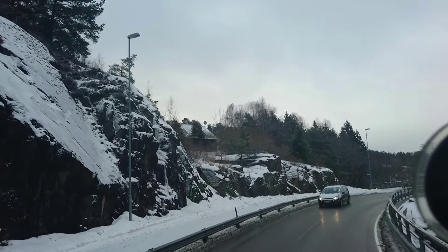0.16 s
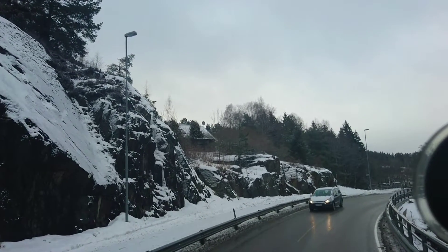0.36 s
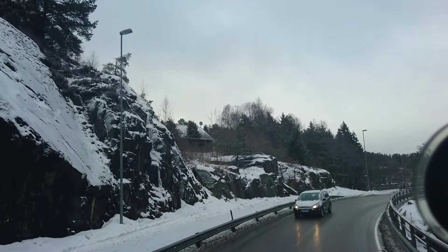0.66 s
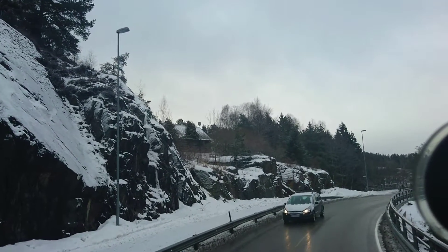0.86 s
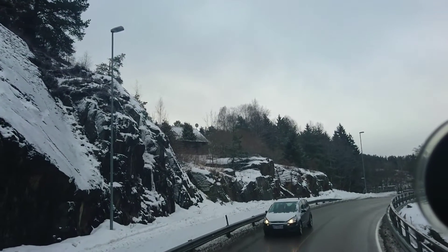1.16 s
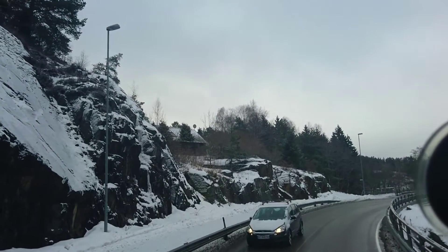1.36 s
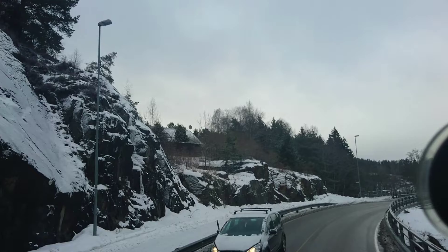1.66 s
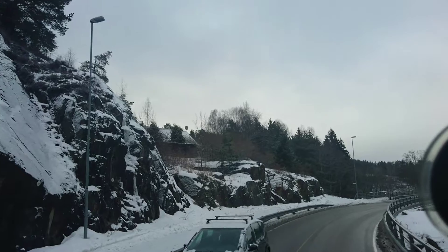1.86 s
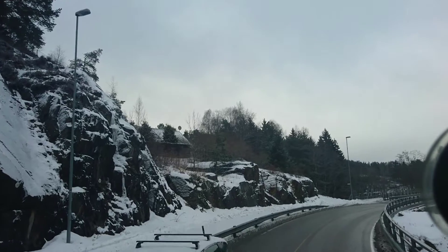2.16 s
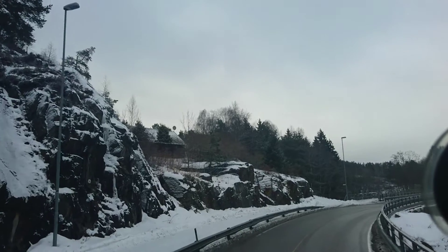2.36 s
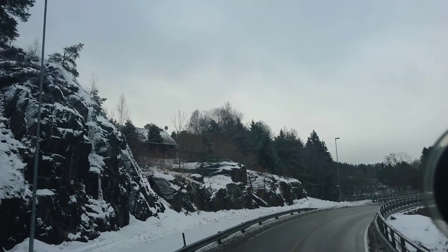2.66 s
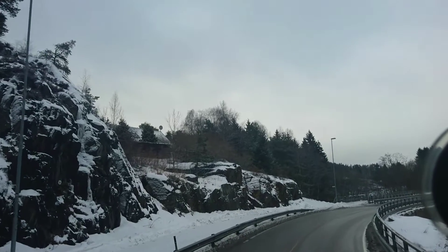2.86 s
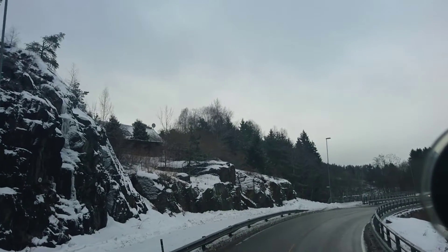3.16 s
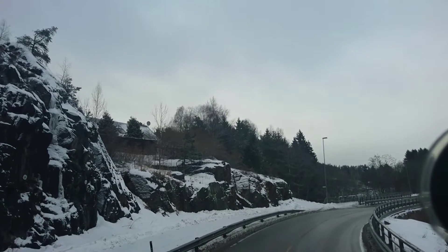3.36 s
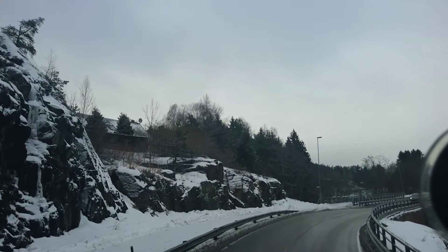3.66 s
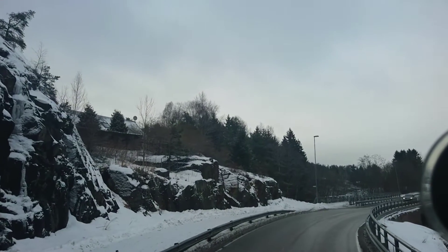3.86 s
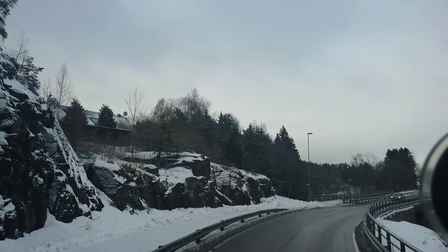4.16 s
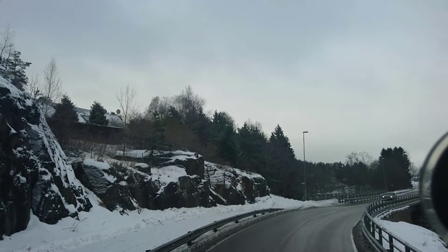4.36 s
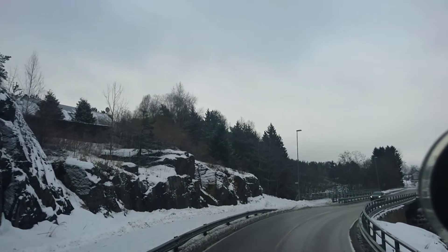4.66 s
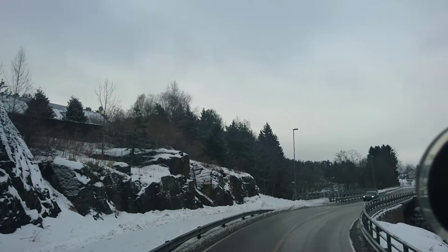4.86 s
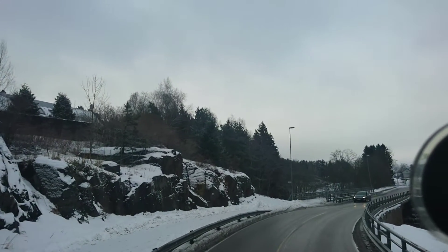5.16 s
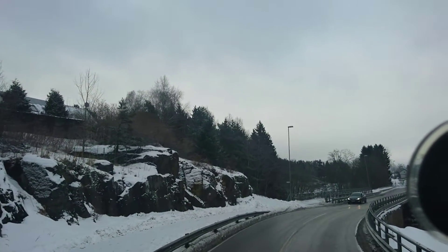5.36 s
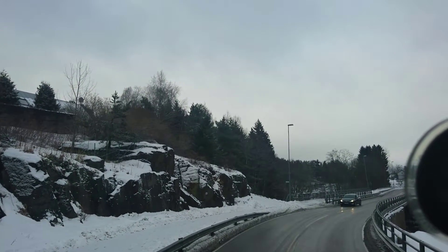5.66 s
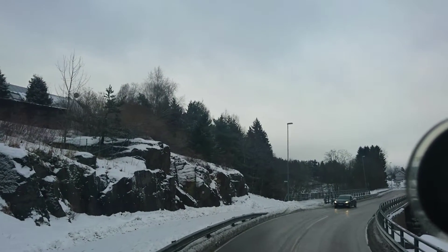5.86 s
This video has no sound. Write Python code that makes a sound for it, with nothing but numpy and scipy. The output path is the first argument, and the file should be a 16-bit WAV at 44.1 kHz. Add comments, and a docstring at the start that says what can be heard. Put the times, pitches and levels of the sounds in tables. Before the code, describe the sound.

Inside a truck cab, the diesel hums and rumbles up through the gears over wet tyre hiss, as a car swishes by.

```python
"""Lorry cab on a wet road

Two microphones inside the cab as the lorry pulls away from idle and shifts up three times. The firings
of the six-cylinder diesel hum through the cab's boom; tyres and engine roar, the turbo whistles faintly.
Outside, an oncoming car swishes past trailing spray; close to the right microphone, small things tick."""
import sys
import numpy as np
from scipy import signal
from scipy.io import wavfile
from scipy.ndimage import uniform_filter1d

SR = 44100
rng = np.random.default_rng(int(sys.argv[2]) if len(sys.argv) > 2 else 0)


def store_wav(level_fs):
    """Save 16-bit WAV to argv[1]."""
    pcm = np.round(np.clip(np.atleast_2d(level_fs), -1, 1) * 32767)
    wavfile.write(sys.argv[1], SR, pcm.T.astype(np.int16))


N = 265482
T = np.arange(N) / SR


def gain_of(db):
    """Decibels to an amplitude factor."""
    return 10 ** (np.asarray(db) / 20)


def unit_rms(x):
    """Scales to rms 1."""
    return x / np.sqrt(np.mean(x ** 2) + 1e-20)


def at_hz(rows, hz, column=1):
    """One column of a frequency table, read on a log-frequency axis."""
    table = np.transpose(rows)
    return np.interp(np.log(hz + 1), np.log(table[0] + 1), table[column])


def over_time(rows):
    """A time table's value at every sample."""
    return np.interp(T, *np.transpose(rows))


def wander(rate_hz):
    """Random drift of rms about 1."""
    t = T[::256]
    drift = sum(np.sin(2 * np.pi * (hz * t + rng.random())) for hz in rate_hz * np.geomspace(.1, 1, 16))
    return np.interp(T, t, unit_rms(drift))


def panned(x, pan_db):
    """Spreads a sound over the two microphones; pan_db is left minus right."""
    return x * gain_of([[pan_db / 2], [-pan_db / 2]])


# Resonances of the panels and air around the microphones: (frequency [Hz], width [Hz], lift [dB])
CAB_MODES = [(120.7, 15, 2.5), (211, 25, 7), (320.5, 42, 7.5), (391.4, 33.5, 7), (559, 30, 6),
             (599.2, 16, 8), (709, 35, 8.5), (949, 111, 6.5), (1259.5, 41, 10), (1402, 66, 5),
             (1670, 79, 3.5), (2026, 15, 5.5), (2530, 60, 3.5), (2990, 46, 5.5), (4500, 860, 2.5)]
def panels_db(hz):
    """The cab's resonances colour every noise from outside."""
    return sum(db / (1 + (2 * (hz - mode_hz) / width) ** 2) for mode_hz, width, db in CAB_MODES)


# The microphone pair in the cab: (frequency [Hz], likeness [0-1], left lead [rad], left minus right [dB])
MIC_PAIR = [(61.3, 1, -1.5, -29), (180, 1, 0.6, -8.5), (330, 0.9, -0.54, -1.5), (587, 0.64, 1.42, -1.5),
            (1022, 0.16, 2.5, -3.5), (1305, 1, 3.5, -3.5), (1490, 0.64, 3.5, -3), (2500, 0.19, 6, -2.5),
            (3170, 0.076, 9.5, -4.5), (4860, 0.097, 13.5, -4.5), (6360, 0.083, 16.5, 2),
            (9050, 0.097, 6, -1)]
def cab_noise(spectrum, patchy_db, size):
    """Cab-coloured noise with drifting patches at the two microphones; their mean has rms 1."""
    frames, hz = 4 * N // size + 5, np.fft.rfftfreq(size, 1 / SR)
    a, b, c, d, patches = rng.standard_normal((frames, len(hz), 5)).T
    patches = unit_rms(uniform_filter1d(uniform_filter1d(patches, size=12, axis=0), size=10, axis=1))
    likeness, lead, pan_db = (at_hz(MIC_PAIR, hz, column)[:, None] for column in (1, 2, 3))
    right, unrelated = a + 1j * b, c + 1j * d
    left = (likeness * right + np.sqrt(1 - likeness ** 2) * unrelated) * np.exp(1j * lead)
    lean = gain_of(pan_db / 2)
    colour_db = (at_hz(spectrum, hz) + panels_db(hz))[:, None] + patchy_db * patches
    spectra = np.array([left * lean, right / lean]) * gain_of(colour_db)
    out = signal.istft(spectra, nperseg=size, noverlap=size - size // 4)[1][:, :N]
    return out / np.sqrt(np.mean(out.mean(0) ** 2))


# The cab's background at the microphones: (frequency [Hz], relative density [dB])
FLOOR_SPECTRUM = [(10, 21), (40, 13.5), (100, 3), (6000, -10.5), (13400, -17)]
def background():
    """Steady deep rumble and faint hiss."""
    return gain_of(-64.5) * cab_noise(FLOOR_SPECTRUM, patchy_db=.5, size=4096)


# Turning points of the turbo's whistle, faint from inside the cab: (time [s], pitch [Hz])
TURBO_PITCH = [(2.2, 4535), (2.82, 5720), (3.2, 5430), (3.45, 5803), (3.72, 5924), (4.12, 5217),
               (4.55, 5769), (5.0, 6686), (5.42, 7195), (5.8, 6880)]
def turbo():
    """A thin, unsteady whistle that rises as the turbo spools up and fades as it runs down."""
    glide_hz = uniform_filter1d(over_time(TURBO_PITCH), size=4000)
    hz = glide_hz + 28 * wander(120)
    fall_khz_per_s = np.maximum(-np.gradient(glide_hz) * SR / 1000, 0)
    level_db = -76.5 - 3 * fall_khz_per_s + 3.5 * wander(25)
    gate = np.clip((T - TURBO_PITCH[0][0]) / 0.55, 0, 1) ** 2 * (T < TURBO_PITCH[-1][0])
    whistle = np.sin(2 * np.pi * np.cumsum(hz) / SR)
    return panned(gain_of(level_db) * gate * whistle, pan_db=-4)


TICK_SAMPLES = 8000
def ring(hz, t60_s, rise_s):
    """One dying mode with a soft start."""
    t = T[:TICK_SAMPLES]
    return np.sin(2 * np.pi * hz * t) * gain_of(-60 * t / t60_s) * (1 - np.exp(-t / rise_s))


def bursts(band_hz, order, decay_s):
    """A dying burst of band noise for each tick."""
    white = rng.standard_normal((len(LOOSE_TICKS), TICK_SAMPLES))
    band = signal.sosfilt(signal.butter(order, band_hz, "bandpass", fs=SR, output="sos"), white)
    return unit_rms(band) * np.exp(-(T[:TICK_SAMPLES] / decay_s) ** 2)


# A loose part close to the right microphone; the last three levels are relative to its high ring:
# (time [s], level [dB], left minus right [dB], low ring [Hz], low ring [dB], snap [dB], rattle [dB])
LOOSE_TICKS = [(1.039, -64.5, -5, 3400, -8, -20, -8), (1.117, -52.5, -11, 3400, -12, -14, -13.5),
               (1.179, -52, -11, 3400, 2, -17, -18), (1.2139, -62, -7, 3400, 16, -10, -15),
               (2.878, -42.5, -21, 2900, 10, -2, -28), (3.834, -50, -6, 3400, -8, -12, -17.5),
               (4.542, -57, -21, 3400, -21, -21, -15.5), (4.6596, -50.5, -24.5, 3600, 4.5, -17, -21)]
def small_things():
    """Ticks of one loose part, each two short rings, a dry snap and a brief rattle; and one clink."""
    out = np.zeros((2, N + TICK_SAMPLES))
    snaps = bursts(band_hz=(2200, 6200), order=2, decay_s=.0018)
    rattles = bursts(band_hz=(5300, 8600), order=3, decay_s=.013)
    for row, snap, rattle in zip(LOOSE_TICKS, snaps, rattles):
        start_s, db, pan_db, low_hz, low_db, snap_db, rattle_db = row
        tick = ring(hz=5800, t60_s=.013, rise_s=.00099)
        tick += gain_of(low_db) * ring(low_hz, t60_s=.009, rise_s=.00053)
        tick += gain_of(snap_db) * snap + gain_of(rattle_db) * rattle
        out[:, round(start_s * SR):][:, :TICK_SAMPLES] += panned(gain_of(db) * tick, pan_db)
    clink = gain_of(-38.5) * ring(hz=1249, t60_s=.18, rise_s=.003)
    out[:, round(3.664 * SR):][:, :TICK_SAMPLES] += panned(clink, pan_db=1)
    return out[:, :N]


# Tyres and spray of a car in the opposite lane, each: (frequency [Hz], relative density [dB])
CAR_TYRES = [(200, -40), (400, -10), (800, -5), (1100, -3.5), (2000, -7.5), (2800, -17.5), (4000, -49)]
CAR_SPRAY = [(900, -31), (2000, -0.5), (3700, -7.5), (4800, -9.5), (7000, -14), (9200, -26), (12500, -52)]
def oncoming_car():
    """Tyre swish falls off with distance; a longer, brighter cloud of spray trails the car."""
    nearest_s, distance_over_speed_s = 3.02, 0.17
    spray_lag_s, spray_width_s = 0.066, 0.23
    tyre_gain = gain_of(-39.5) / (1 + ((T - nearest_s) / distance_over_speed_s) ** 2) ** 1.12
    spray_gain = gain_of(-49) / (1 + ((T - nearest_s - spray_lag_s) / spray_width_s) ** 4) ** 0.56
    tyres = tyre_gain * cab_noise(CAR_TYRES, patchy_db=.8, size=1024)
    return tyres + spray_gain * cab_noise(CAR_SPRAY, patchy_db=.8, size=1024)


# The driver's gear changes: (time [s], effort during the lift [dB], lasting change of effort [dB])
GEAR_CHANGES = [(2.96, -2, -0.5), (3.79, -8.5, -0.2), (5.58, -2, 0)]
PULL_AWAY_S = 0.55
def effort_db():
    """Effort rises from idle as the lorry pulls away and dips in a short lift at each gear change."""
    idle_db, rise_s, lift_width_s = -6.5, 2.1, 0.081
    pull = np.clip((T - PULL_AWAY_S) / rise_s, 0, 1)
    shifts = sum(lift_db * np.exp(-((T - shift_s) / lift_width_s) ** 2) + after_db * (T > shift_s)
                 for shift_s, lift_db, after_db in GEAR_CHANGES)
    return idle_db * (1 - pull) + uniform_filter1d(shifts, size=800)


def speed_octaves():
    """Engine speed in octaves from the top of a gear, 62 firings a second."""
    return np.log2(over_time(FIRING_RATE) / 62)


def clutch_db():
    """The cab shudders briefly as the clutch bites."""
    bite_s, width_s = 0.886, 0.098
    return 7 * np.exp(-((T - bite_s) / width_s) ** 2)


def boom_db():
    """The boom follows engine speed, effort and the clutch's shudder."""
    return -34 + 11 * speed_octaves() + 0.43 * effort_db() + clutch_db()


def roar_db():
    """The roar follows the engine a little late; the tyres add to it as the lorry gathers speed."""
    lag_s, tyre_db_per_s = 0.04, 0.1275
    level_db = -42 + 5.5 * speed_octaves() + 0.033 * effort_db() + tyre_db_per_s * T + 0.17 * clutch_db()
    return np.interp(T - lag_s, T, level_db)


def hiss_db():
    """Wet-tyre hiss grows with time spent rolling and with engine speed."""
    creep_s = 0.35
    rolling_s = np.maximum(T - PULL_AWAY_S, 0) + creep_s
    return -63 + 3.5 * np.log2(rolling_s) + 1.5 * speed_octaves()


# Cab boom, engine and tyre roar, and wet-tyre hiss from inside: (frequency [Hz], relative density [dB])
BOOM_SPECTRUM = [(12, -43.5), (45, -6.5), (70, -0.5), (95, 4.5), (125, 7.5), (150, -7.5), (200, -16.5),
                 (400, -14), (600, -59)]
ROAR_SPECTRUM = [(90, -43), (150, -5), (200, -14), (270, -15), (450, -12.5), (800, -17), (1150, -22.5),
                 (1700, -19.5), (2500, -28), (3800, -40), (5500, -61)]
HISS_SPECTRUM = [(600, -26.5), (1100, -0.5), (1700, -10), (2500, -12.5), (3300, -16), (4700, -16),
                 (6100, -19.5), (7100, -20.5), (9200, -32), (11000, -62)]
def driving_noise():
    """Road shocks drum in the cab's boom; roar and hiss throb with each engine cycle of six firings."""
    cycle = firing_phase() / 6
    throb_db = .8 * np.sin(cycle) + .5 * np.sin(2 * cycle) + .6 * np.sin(6 * cycle)
    boom = gain_of(boom_db() - 3) * cab_noise(BOOM_SPECTRUM, patchy_db=2, size=4096)
    roar = gain_of(roar_db() + throb_db) * cab_noise(ROAR_SPECTRUM, patchy_db=0.67, size=2048)
    hiss = gain_of(hiss_db() + throb_db) * cab_noise(HISS_SPECTRUM, patchy_db=2, size=2048)
    return boom + roar + hiss


# The diesel from idle up through the gears: (time [s], firing rate [Hz])
FIRING_RATE = [(0.0, 30.32), (0.74, 28.46), (1.04, 33.96), (1.34, 33.87), (1.56, 41.29), (2.41, 59.24),
               (2.7, 63.14), (2.87, 62.25), (3.0, 50.7), (3.2, 56.5), (3.44, 61.02), (3.66, 59.9),
               (3.92, 49.32), (4.04, 48.83), (4.29, 54.37), (4.49, 53.34), (4.84, 60.82), (5.45, 62.86),
               (5.72, 50.85), (6.02, 53.72)]
def firing_phase():
    """Advances one full turn each time a cylinder fires."""
    return 2 * np.pi * np.cumsum(over_time(FIRING_RATE)) / SR


def diesel_knock():
    """High multiples of the firing rate stand out where they cross a panel's resonance."""
    coarse = slice(0, N, 256)
    hz, phase = over_time(FIRING_RATE)[coarse], firing_phase()
    out = np.zeros((2, N))
    for k in range(5, 48):
        level_db = at_hz(ROAR_SPECTRUM, k * hz) + 1.15 * panels_db(k * hz) + 3 * wander(6)[coarse]
        mic_phases = 2 * np.pi * rng.random((2, 1))
        out += np.interp(T, T[coarse], gain_of(level_db)) * np.sin(k * phase + mic_phases)
    return panned(gain_of(roar_db() - 8) * out, pan_db=-4.5)


# How loud an engine tone is inside the cab at full effort: (frequency [Hz], level [dB])
CAB_RESPONSE = [(28, -53), (36, -40), (50, -35), (54.5, -37.5), (57.5, -38), (62, -33.5), (75, -45.5),
                (100, -40), (108, -40.5), (115, -31), (121, -37.5), (126, -34.5), (150, -41.5),
                (170, -39.5), (250, -43.5)]
# The firing tone and its 2nd to 4th multiples: (level offset [dB], share of effort [dB/dB])
FIRING_HARMONICS = [(0, 0.78), (0.9, 2.34), (-11.5, .6), (-13, 0.39)]
# Orders from uneven cylinders: (frequency [sixths of the firing rate]) and (level before the boom [dB])
UNEVEN_SIXTHS = [9, 10, 14, 15, 21]
UNEVEN_DB = [-13, -17.5, -15.5, -7.5, -10]
def diesel_hum():
    """The firings make four nearly clean tones; weaker orders from uneven cylinders swell in the boom."""
    hz, phase = over_time(FIRING_RATE), firing_phase()
    levels_db = [db + at_hz(CAB_RESPONSE, k * hz) + share * effort_db()
                 for k, (db, share) in enumerate(FIRING_HARMONICS, 1)]
    out = gain_of(levels_db[0] + 1.6 * wander(12)) * np.sin(phase)
    for k, level_db in enumerate(levels_db[1:], 2):
        out += gain_of(level_db + 1.5 * wander(14)) * np.sin(k * phase + .25 * wander(9))
    for k, db in zip(np.divide(UNEVEN_SIXTHS, 6), UNEVEN_DB):
        level_db = db + at_hz(BOOM_SPECTRUM, k * hz) + boom_db() + 2.6 * wander(7)
        out += gain_of(level_db) * np.sin(k * phase + 2 * np.pi * rng.random() + 0.44 * wander(8))
    return panned(np.sqrt(2) * out, pan_db=-4)


def scene():
    """Everything that reaches the two microphones in the cab."""
    floor = background()
    lorry = diesel_hum() + diesel_knock() + driving_noise()
    return floor + lorry + oncoming_car() + turbo() + small_things()


def record(dry):
    """The microphones' treble steps down at a shelf and ends at the band limit."""
    shelf_hz, shelf_db, limit_hz = 9356, -2.5, 13400
    low, full = (signal.firwin(511, hz, window=("kaiser", 9), fs=SR) for hz in (shelf_hz, limit_hz))
    response = low + gain_of(shelf_db) * (full - low)
    return signal.oaconvolve(dry, response[None], "same")


dry = scene()
out = record(dry)
store_wav(out)
```